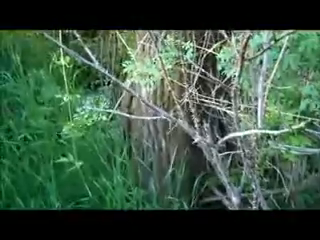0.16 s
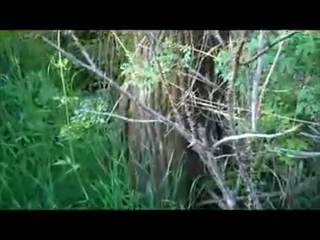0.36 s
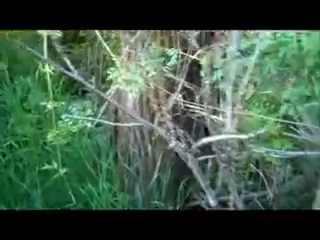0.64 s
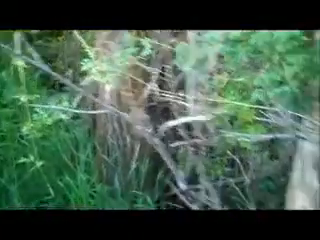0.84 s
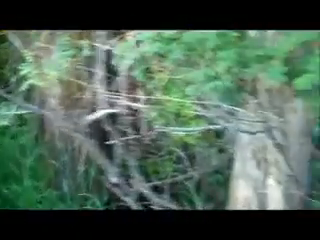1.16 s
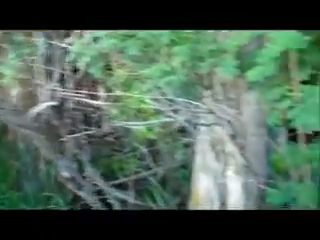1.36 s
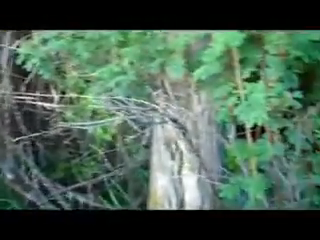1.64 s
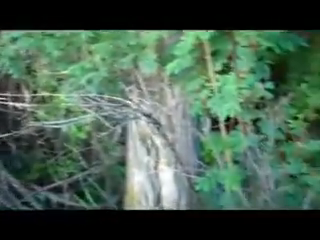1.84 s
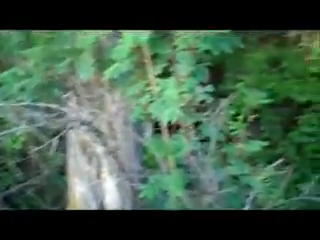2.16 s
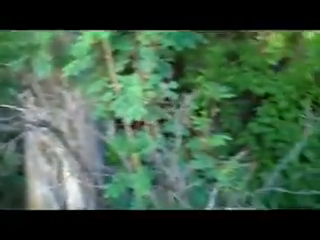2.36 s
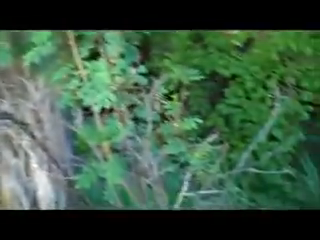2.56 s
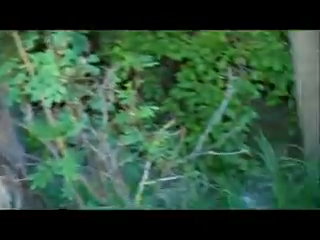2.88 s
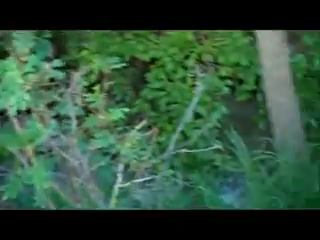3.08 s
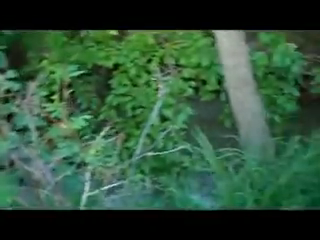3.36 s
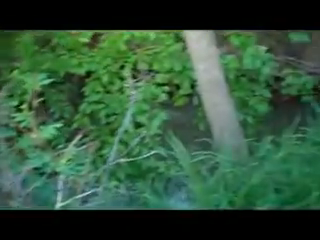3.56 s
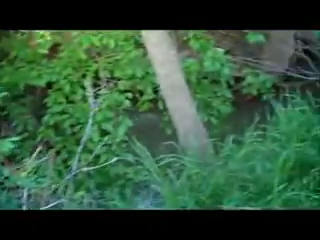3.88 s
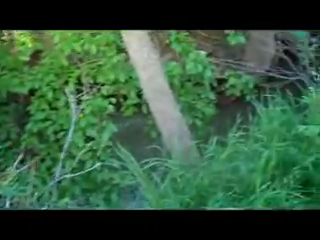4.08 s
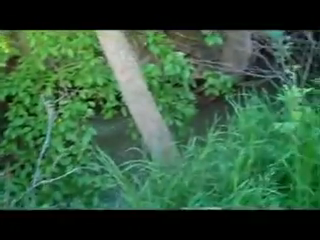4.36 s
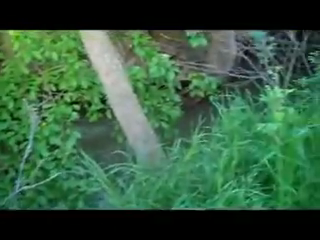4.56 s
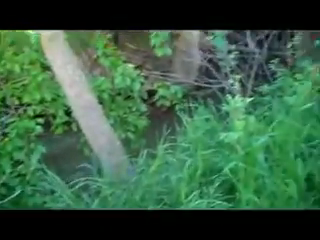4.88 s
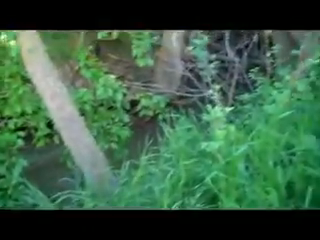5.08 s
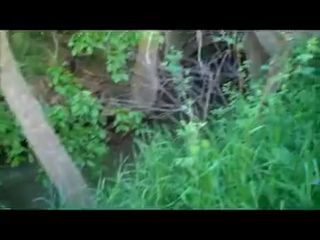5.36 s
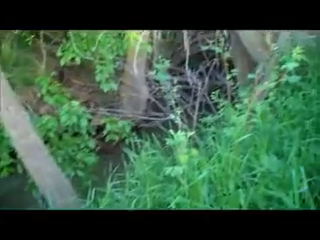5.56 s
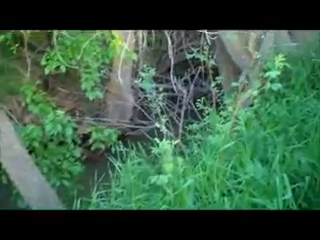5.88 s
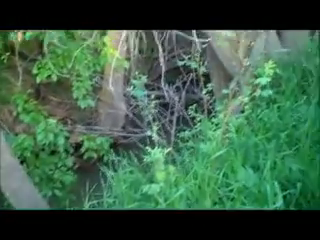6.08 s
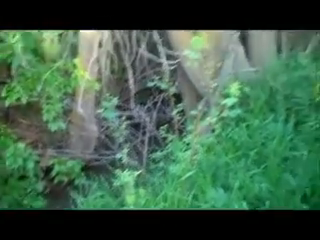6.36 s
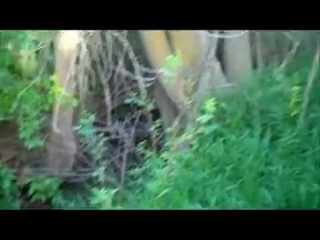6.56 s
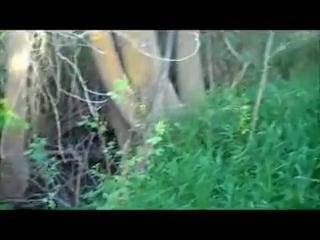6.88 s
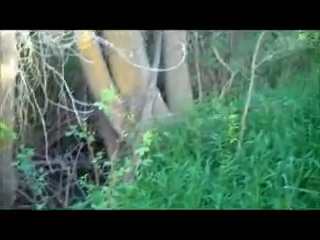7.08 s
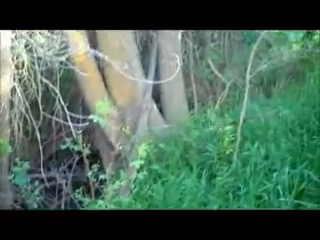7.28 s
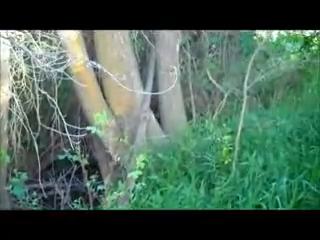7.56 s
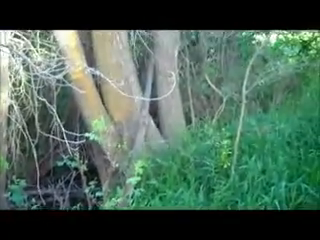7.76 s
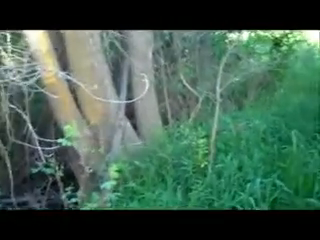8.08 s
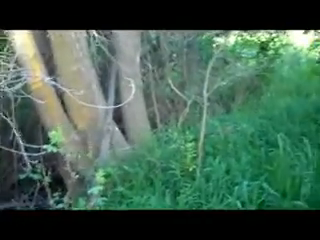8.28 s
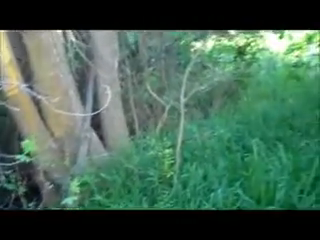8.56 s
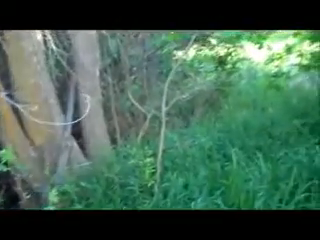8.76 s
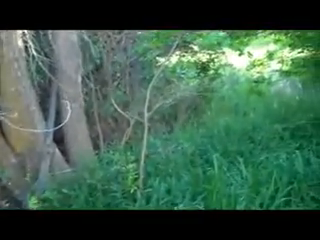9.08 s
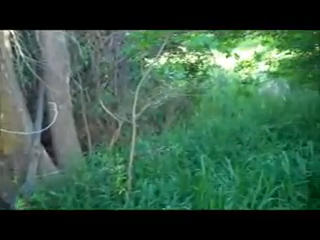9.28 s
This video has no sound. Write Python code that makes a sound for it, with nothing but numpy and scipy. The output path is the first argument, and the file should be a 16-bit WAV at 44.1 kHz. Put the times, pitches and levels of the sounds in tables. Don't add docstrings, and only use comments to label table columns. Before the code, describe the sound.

Water pours steadily through a gate into a ditch, a dense bright fizzing rush with small slaps and soft low wind bumps.

```python
import sys
import numpy as np
from scipy import signal
from scipy.io import wavfile
from scipy.ndimage import uniform_filter1d

SR = 44100
rng = np.random.default_rng(int(sys.argv[2]) if len(sys.argv) > 2 else 0)


def wrap_up_sound(samples):
    columns = np.atleast_2d(samples).T
    tamed = np.clip(columns, -1, 1)
    steps = np.round(tamed * 32767).astype(np.int16)
    wavfile.write(sys.argv[1], SR, steps)


def decibels_to_gain(level_db):
    exponent = np.asarray(level_db, float) / 20
    return 10 ** exponent


N = 415422

# time in seconds, turn from 0 to 1.
TURN = [
    (0, 0),
    (1, .07),
    (3, .5),
    (5, 0.5),
    (6, .79),
    (8, .93),
    (9.42, 1),
]
# time in seconds, peak in dB.
PEAKS = [(0.014, -8), (0.3361, -12), (0.392, -5), (.456, -6), (0.926, -5.5), (1.728, -8), (1.962, -3),
         (2.0338, -10), (2.548, -5), (2.6735, -3), (2.892, -3.5), (3.639, -10.5), (3.898, -5.5),
         (4.0781, -2.5), (4.221, -8), (5.306, -4.5), (5.5742, -10), (5.8802, -7), (7.061, -9), (7.23, -14),
         (7.305, -0.5), (7.403, -10), (8.1873, -7), (8.311, -6.5), (8.3794, -11), (8.5624, -7.5),
         (8.871, -4), (9.196, -5), (9.405, -5)]
# frequency in Hz, share of the power that comes straight.
DIRECT = [(80, 0.27), (200, .75), (350, .85), (1100, .76), (2200, .58), (4000, 0.37), (7000, 0.21),
          (9000, 0.15)]
# frequency in Hz, level in dB.
LEFT_COLOUR = [(30, -23), (90, -17.5), (170, -9), (270, -5), (800, -3.5), (1700, -3.5), (2600, -2.5),
               (3800, -3), (4600, -1.5), (5600, -0.4), (6700, 3.5), (7450, 8.5), (8200, 3), (9200, -5),
               (10000, -9), (11200, -13)]
# frequency in Hz, level in dB.
RIGHT_COLOUR = [(30, -25), (90, -17), (170, -10.5), (270, -3.5), (800, -4), (1200, -3.5), (1700, -5),
                (2600, -3), (3800, -3.5), (5200, -2.5), (6200, 2), (6750, 1.4), (7200, -9), (8000, -15),
                (8800, -25.5), (11200, -22.5)]
# frequency in Hz, share of the shade.
SHADED = [(500, 0.064), (1200, 0.42), (2200, 2.1), (3800, 1.6), (5500, 0.32), (8000, 0.12)]
# time in seconds, frequency in Hz, depth in dB.
HAND = [
    (0, 4050, -2.5),
    (1.2, 3750, -1.5),
    (3, 4160, -1.5),
    (4.5, 4450, -1.5),
    (5.5, 4300, -1),
    (6.8, 4640, -0.5),
    (8, 4500, 0),
    (9.42, 4670, -0.5),
]
# time in seconds, depth in dB.
HOLLOW = [
    (0, 1),
    (1.5, -0.5),
    (2.5, -3),
    (3.3, -1.5),
    (4.8, -1.5),
    (6.1, -2.5),
    (7, 0),
    (9.42, 1),
]
# time in seconds, left in dB, right in dB.
GAPS = [
    (0, -1.5, 0),
    (1.5, -.5, 0.5),
    (2.5, 1, 0),
    (4, 0.6, 0),
    (5.3, 1.5, -1),
    (6.2, 0, -1),
    (7.5, .3, -1.3),
    (8.5, 1, 0.5),
    (9.42, -1, -1.5),
]
# start in seconds, length in seconds, level in dB.
LOW_BURSTS = [(0.035, 0.097, -46), (0.25, 0.032, -50), (0.317, 0.033, -54), (0.445, 0.064, -49),
              (0.803, 0.059, -47), (1.506, 0.046, -47), (1.68, 0.087, -53), (2.028, 0.03, -48.5),
              (2.174, 0.044, -44.5), (2.358, 0.048, -53), (2.473, 0.04, -51), (2.537, 0.036, -47),
              (2.72, .05, -51), (2.861, 0.054, -49), (3.02, 0.036, -47), (3.116, 0.072, -43),
              (3.234, 0.026, -45), (3.311, 0.032, -52), (3.361, 0.034, -52), (3.588, 0.05, -47),
              (3.822, 0.026, -49), (4.472, .03, -54), (4.617, 0.029, -55), (4.88, 0.04, -47), (5.035, 0.05, -54),
              (5.368, 0.052, -48), (5.505, 0.034, -48), (5.65, 0.032, -51), (5.7, 0.046, -42),
              (5.898, 0.041, -47), (5.973, 0.052, -47), (6.055, 0.03, -53), (6.115, 0.032, -48),
              (6.222, 0.028, -49), (6.31, .034, -47), (6.407, 0.034, -48), (6.529, .03, -53), (6.676, 0.03, -47),
              (6.736, 0.038, -44), (6.836, 0.033, -44), (6.903, 0.05, -48), (7.1, .034, -50), (7.178, .034, -50),
              (7.272, 0.15, -48.5), (7.52, 0.25, -47), (7.886, 0.064, -52.5), (8.065, 0.05, -39.5),
              (8.206, 0.096, -44), (8.328, 0.031, -49), (8.464, 0.3, -46), (8.783, 0.032, -51),
              (8.833, 0.044, -42), (8.975, 0.045, -44.5), (9.084, 0.049, -42.5), (9.184, 0.033, -46)]

FLOW_DB, SPLASH_S, SPLASH_DB, SPLASH_LONG_S = -16, 5.64, 2, 0.034
PEAK_OVER_DB, PEAK_RISE_S, PEAK_FADE_S = 8, 0.00069, 0.0076
LAG_US, ECHO_MS, ECHO_SHARE = (-39.5, 104), (2.02, 1.62), (0.43, 0.25)
TRUNK_MS, TRUNK_SHARE, TRUNK_DULL_HZ = (0.93, 0.9), (0.32, 0.02), 2620
SHADE_LEFT_DB, SHADE_RIGHT_DB = (-0.2, -1), (-0.43, -2.5)
BURST_LEFT, BURST_RIGHT = (0.1, 0.69), (0.64, 0.38)
HAND_WIDE_HZ, HOLLOW_HZ, HOLLOW_WIDE_HZ = 592, 1024, 130.3
GURGLE_HZ, GURGLE_OCTAVES = 1780, 0.7
HEAVE_DB, HEAVE_HZ = 1.5, 408
CALM_DB, BURST_EDGE_DB_PER_S, FLUTTER_DB = -61, 299, 2.5
THUMP_HZ, THUMP_OVER_DB, THUMP_LEFT = (51.8, 111), 4, 0.8


def evened(x):
    return x / np.sqrt(np.mean(abs(x) ** 2) + 1e-20)


def read(points, hz, index=1):
    rows = np.transpose(points)
    return np.interp(np.log(hz + 1), np.log(rows[0] + 1), rows[index])


def moving(points, t, index=1):
    rows = np.transpose(points)
    return np.interp(t, rows[0], rows[index])


def turned(ends, turn):
    return ends[0] + (ends[1] - ends[0]) * turn


def patches(shape, tall, long):
    blur = uniform_filter1d(rng.standard_normal(shape), max(int(tall), 1), -2)
    return evened(uniform_filter1d(blur, max(int(long), 1), -1))


def grains(low_hz, high_hz, cycles, per_s, spread_db, rise, count=24):
    out = np.zeros(N)
    for hz in np.geomspace(low_hz, high_hz, count):
        u = np.arange(0, 4, hz / cycles / SR)
        tone = np.sin(2 * np.pi * cycles * (u + rise * u ** 2))
        ring = tone * np.exp(-u) * (1 - np.exp(-8 * u))
        starts = rng.random(N) < per_s / count / SR
        size = np.minimum(rng.exponential(1, N), 4)
        out += signal.oaconvolve(starts * decibels_to_gain(spread_db * size), ring)[:N]
    return evened(out)


def fall():
    roar = rng.standard_normal(N)
    spray = grains(1446, 10000, cycles=3.45, per_s=3000, spread_db=3.5, rise=0.027)
    bubbles = grains(500, 2800, cycles=16, per_s=150, spread_db=2.0, rise=0.029)
    return evened(roar + decibels_to_gain(-10) * spray + decibels_to_gain(-17) * bubbles)


def peaks():
    hits, u = np.zeros(N), np.arange(2000) / SR
    for s, peak_db in PEAKS:
        hits[round(s * SR)] = max(peak_db + PEAK_OVER_DB, 0)
    swell = np.exp(-u / PEAK_FADE_S) * (1 - np.exp(-u / PEAK_RISE_S))
    return signal.oaconvolve(hits, swell)[:N]


def churn(shape):
    both = shape[1:]
    return .6 * patches(both, 12, 11) + .4 * patches(shape, 6.9, 90) + .5 * patches(both, 200, 5)


def heave(shape, hz):
    return HEAVE_DB * patches(shape, 4, 19) / (1 + (hz / HEAVE_HZ) ** 2)


def bounces(pour, hz, turn):
    spin = -2j * np.pi * hz
    bank = turned(ECHO_SHARE, turn) / (1 + (hz / 1100) ** 2)
    bank = bank * np.exp(spin * turned(ECHO_MS, turn) / 1000)
    trunk = turned(TRUNK_SHARE, turn) / (1 + (hz / TRUNK_DULL_HZ) ** 2)
    trunk = trunk * np.exp(spin * turned(TRUNK_MS, turn) / 1000)
    return pour * (1 - bank + trunk)


def ports(pour, wash, hz, turn):
    late = np.exp(-2j * np.pi * hz * turned(LAG_US, turn) / 1e6)
    share = np.clip(read(DIRECT, hz), 0, 1)
    straight = pour * np.array([np.ones(pour.shape), late])
    return np.sqrt(share) * straight + np.sqrt(1 - share) * wash


def colour(hz, t, turn):
    shade_db = np.array([turned(SHADE_LEFT_DB, turn), turned(SHADE_RIGHT_DB, turn)])[:, None]
    tint_db = np.array([read(LEFT_COLOUR, hz), read(RIGHT_COLOUR, hz)]) + read(SHADED, hz) * shade_db
    tint_db[0] += moving(HAND, t, 2) * np.exp(-((hz - moving(HAND, t)) / HAND_WIDE_HZ) ** 2)
    tint_db += moving(HOLLOW, t) * np.exp(-((hz - HOLLOW_HZ) / HOLLOW_WIDE_HZ) ** 2)
    gurgle = np.exp(-(np.log2((hz + 1) / GURGLE_HZ) / GURGLE_OCTAVES) ** 2)
    gap_db = np.array([moving(GAPS, t), moving(GAPS, t, 2)])[:, None]
    return tint_db + gurgle * (gap_db + 1.05 * patches((len(hz), len(t)), 7, 6))


def low_bursts(t):
    start, length, level_db = np.transpose(LOW_BURSTS)[:, :, None]
    outside = np.maximum(np.maximum(start - t, t - start - length), 0)
    calm_db = CALM_DB + FLUTTER_DB * patches((1, len(t)), 1, 14)[0]
    return np.maximum((level_db - BURST_EDGE_DB_PER_S * outside).max(0), calm_db)


def bass_lift(hz, t, turn):
    share = np.array([turned(BURST_LEFT, turn ** 6), turned(BURST_RIGHT, turn ** 6)])
    burst_db = (share * (low_bursts(t) + 55))[:, None]
    return burst_db / (1 + (hz / 125) ** 6)


def thumps():
    out = np.zeros(N + SR)
    for s, length, level_db in LOW_BURSTS:
        from_hz, to_hz = rng.uniform(*THUMP_HZ, 2)
        u = np.arange(0, length + 0.028, 1 / SR)
        edge = np.minimum(np.minimum(u, u[::-1]) / 0.026, 1)
        pitch_hz = from_hz + (to_hz - from_hz) * u / u[-1]
        push = edge * np.sin(2 * np.pi * np.cumsum(pitch_hz) / SR)
        first = max(round((s - .01) * SR), 0)
        out[first:first + len(u)] += decibels_to_gain(level_db + THUMP_OVER_DB) * push
    turn = moving(TURN, np.arange(N) / SR)
    return out[:N] * np.array([THUMP_LEFT * turn ** 12, np.ones(N)])


def scene():
    hz, t, pour = signal.stft(fall(), SR, nperseg=1024, noverlap=768)
    wash = signal.stft(rng.standard_normal((2, N)), SR, nperseg=1024, noverlap=768)[2]
    hz, turn = hz[:, None], moving(TURN, t)
    heard = ports(bounces(pour, hz, turn), wash, hz, turn)
    gain_db = colour(hz, t, turn) + churn(heard.shape) + heave(heard.shape, hz) + bass_lift(hz, t, turn)
    water = signal.istft(heard * decibels_to_gain(gain_db), SR, nperseg=1024, noverlap=768)[1][:, :N]
    slosh_db = SPLASH_DB * np.exp(-((np.arange(N) / SR - SPLASH_S) / SPLASH_LONG_S) ** 2)
    return decibels_to_gain(FLOW_DB + slosh_db + peaks() + 1.56) * evened(water) + thumps()


def band_limit(x):
    return signal.sosfilt(signal.butter(12, 10960, fs=SR, output="sos"), x)


def record(dry):
    mix = np.clip(dry, -.78, .78)
    return band_limit(mix)


dry = scene()
out = record(dry)
wrap_up_sound(out)
```